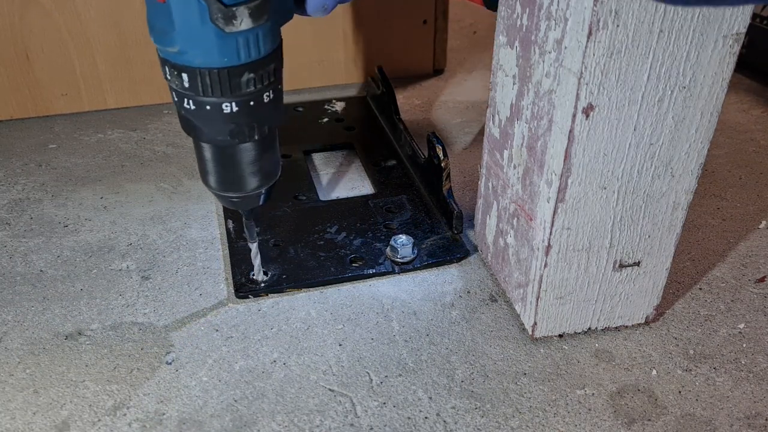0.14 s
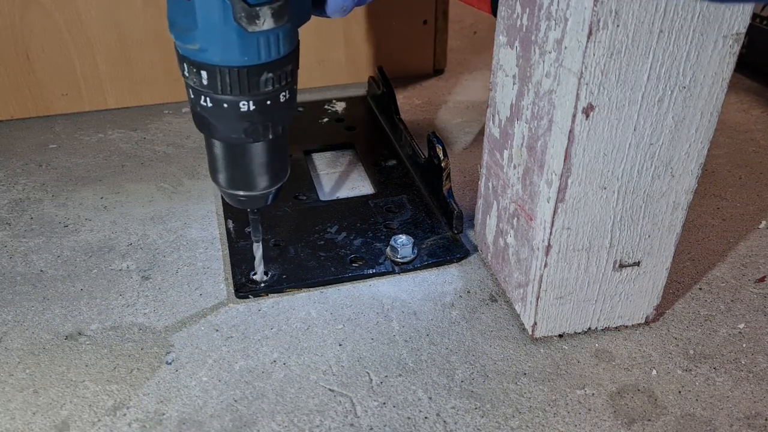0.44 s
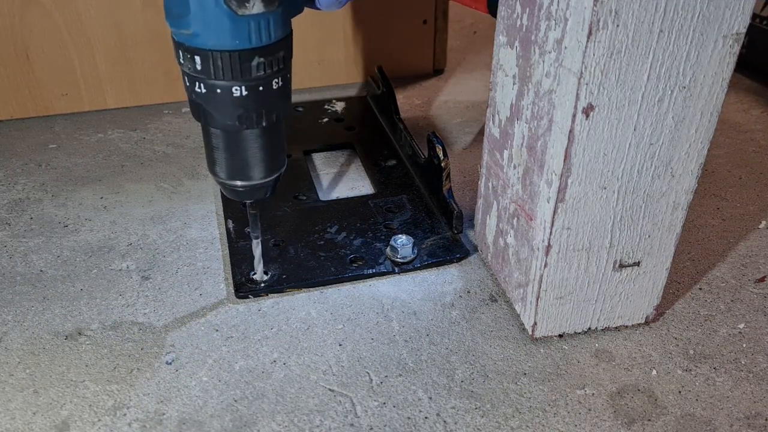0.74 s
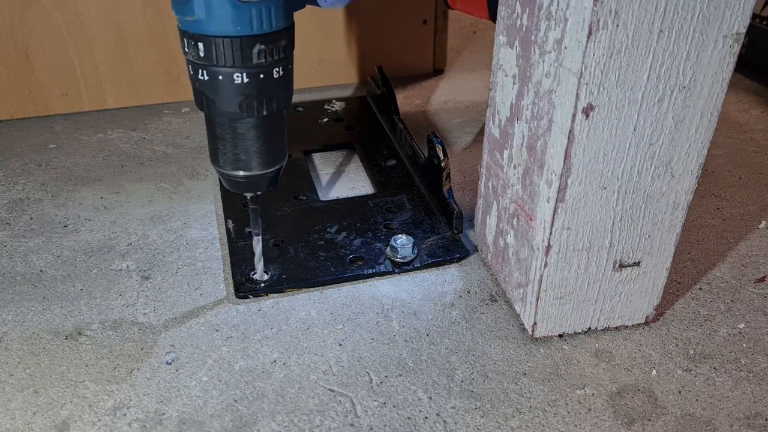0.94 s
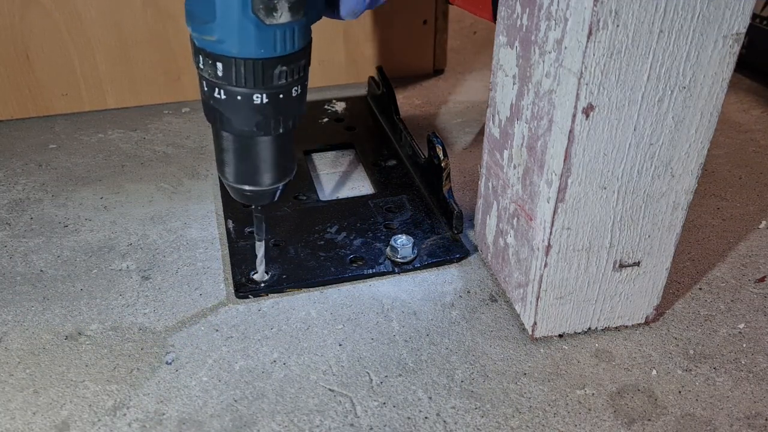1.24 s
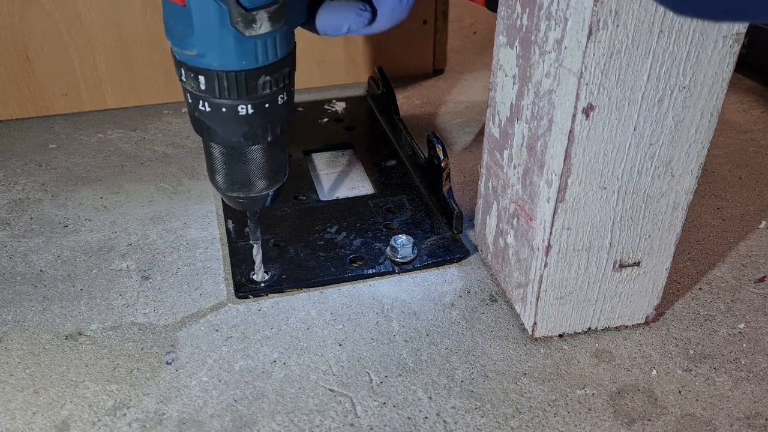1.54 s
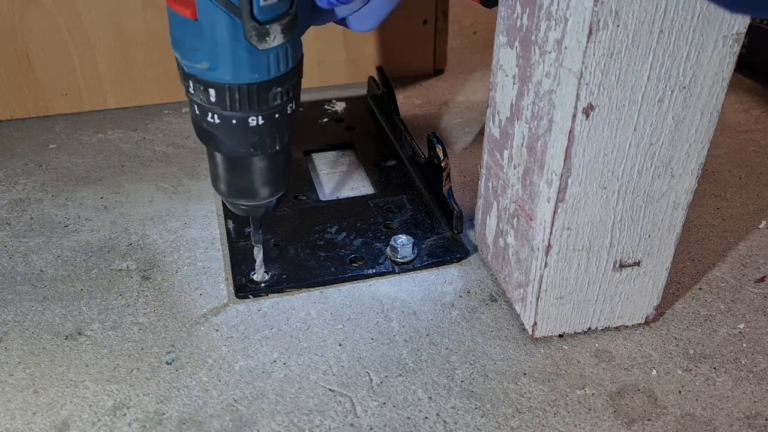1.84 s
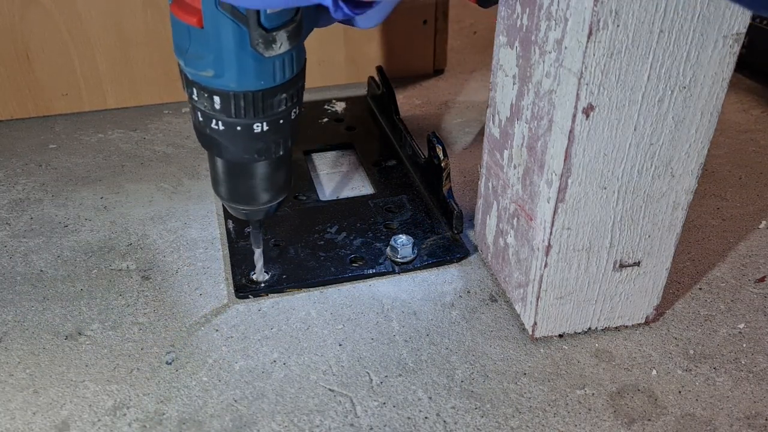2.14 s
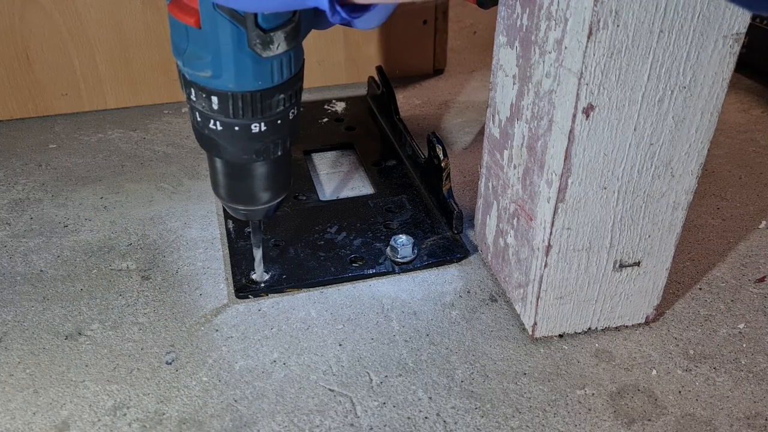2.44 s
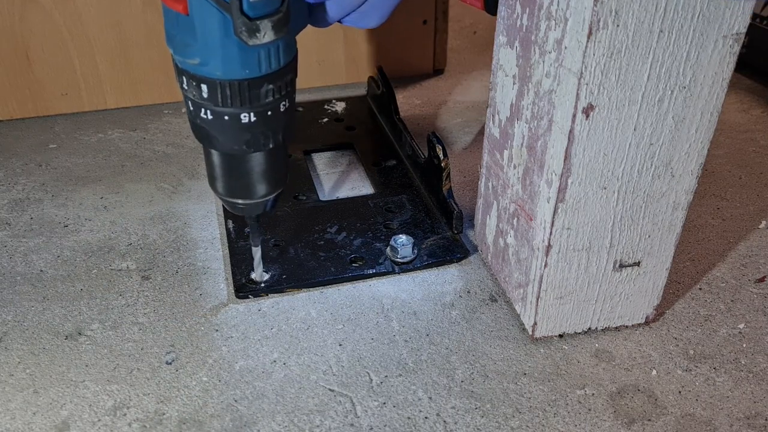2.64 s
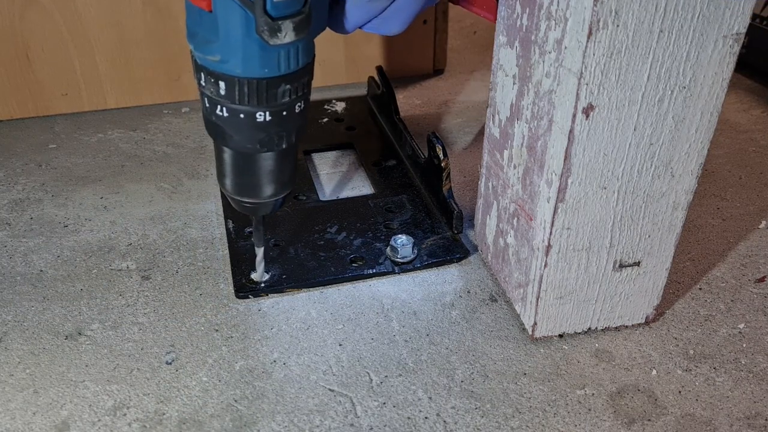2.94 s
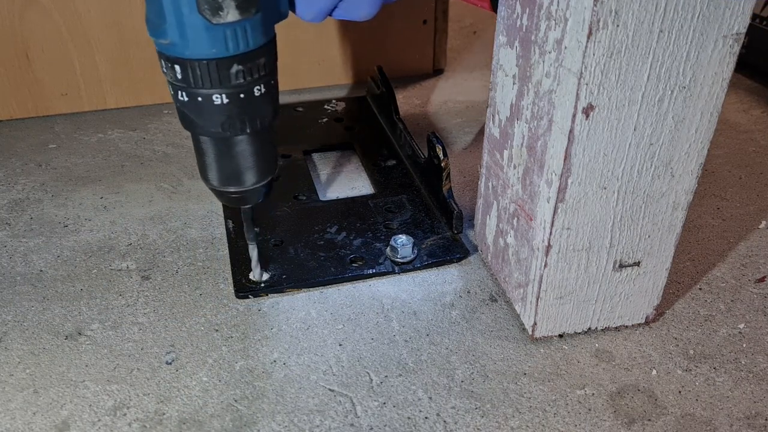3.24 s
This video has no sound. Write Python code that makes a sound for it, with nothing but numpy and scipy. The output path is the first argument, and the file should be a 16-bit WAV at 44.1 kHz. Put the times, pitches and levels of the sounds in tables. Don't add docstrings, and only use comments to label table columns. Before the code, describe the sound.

Cordless hammer drill buzzes harshly on a concrete floor, steps up, pauses, and restarts higher

```python
import sys
import numpy as np
from scipy import signal
from scipy.fft import rfft, irfft, next_fast_len
from scipy.io import wavfile
from scipy.ndimage import map_coordinates

SR = 44100
rng = np.random.default_rng(int(sys.argv[2]) if len(sys.argv) > 2 else 0)


def waveform_to_disk(signal):
    frames = np.transpose(np.atleast_2d(signal))
    scaled = np.clip(frames, -1, 1) * 32767
    samples = np.round(scaled).astype(np.int16)
    wavfile.write(sys.argv[1], SR, samples)


def boost(x):
    u = np.asarray(x, float) / 20
    return 10 ** u


N = 149940

# (time [s], blow rate [1/s])
FIRST = [(0, 83.2), (.11, 85.2), (.27, 85.6), (.44, 84.5), (.5, 86.3), (.564, 134.5), (.6, 143.5),
         (.66, 150.4), (1.07, 151.9), (1.22, 155), (1.35, 155.6), (1.405, 128)]
SECOND = [(1.932, 63), (2.032, 141.5), (2.158, 252.4), (2.204, 270), (2.358, 268), (2.41, 261.5),
          (2.72, 259.5), (2.81, 255), (3.12, 258.7), (3.2, 265.8), (3.4, 265)]


def unit(x):
    return x / np.sqrt(np.mean(x ** 2) + 1e-20)


def along(points, hz):
    f, v = np.transpose(points)
    return np.interp(np.log(hz + 1), np.log(f + 1), v)


def wobble(rate):
    knots = rng.standard_normal(int(N * rate / SR) + 4)
    return map_coordinates(knots, [np.arange(N) * rate / SR])


def filtered(x, response):
    m = next_fast_len(N + SR // 2)
    return irfft(rfft(x, m) * response(np.fft.rfftfreq(m, 1 / SR)), m)[..., :N]


def body(peaks):
    def response(f):
        total = 0
        for k, (centre, width, db) in enumerate(peaks):
            damping = 1j * f * width
            total = total + (-1) ** k * boost(db) * damping / (centre ** 2 - f * f + damping)
        return total
    return response


def spikes(times, sizes):
    at = np.clip(times * SR, 0, N - 2)
    i = at.astype(int)
    return np.bincount(i, sizes * (1 - at + i), N) + np.bincount(i + 1, sizes * (at - i), N)


def air():
    # (frequency [Hz], level [dB])
    hush = [(18, -41.5), (30, -6), (141, -11.5), (988, -38.5), (1350, -30), (2010, -33), (16000, -32)]
    noise = rng.standard_normal((2, N))
    return boost(-56.5) * unit(filtered(noise, lambda f: boost(along(hush, f))))


def garage(x):
    # (frequency [Hz], decay time t60 [s])
    decay = [(100, 0.18), (500, 0.39), (2000, 0.23), (6000, 0.2), (14000, 0.055)]
    # (frequency [Hz], room over direct [dB])
    wetness = [(60, -23.5), (250, -7), (600, -7.5), (2000, -2), (8000, -4.5)]
    hop = 5120
    out = np.zeros((2, N + 2 * SR))
    padded = np.pad(x, (hop, 3 * hop))
    fade = np.sin(np.pi * np.arange(2 * hop) / (2 * hop))
    for start in range(0, N + hop, hop):
        hz, t, z = signal.stft(rng.standard_normal((2, SR // 3)), SR, nperseg=256)
        z = z * boost(-60 * t / along(decay, hz)[:, None])
        energy = np.sum(abs(z) ** 2, axis=2).mean(axis=0)
        z = z / np.sqrt(energy)[:, None] * boost(along(wetness, hz))[:, None]
        tail = signal.istft(z, SR, nperseg=256)[1] / 115
        piece = padded[start:start + 2 * hop] * fade
        wet = signal.fftconvolve(piece[None], tail, axes=1)
        out[:, start:start + wet.shape[1]] += wet
    return out[:, hop - 130:][:, :N]


def motor_windup():
    t = np.arange(N) / SR
    begin, end = 1.893, SECOND[0][0]
    rise_db = 5 * np.clip((t - begin) / (end - begin), 0, 1)
    turning = (t > begin) * (t < end) * boost(-42 + rise_db)
    housing = body([(507, 600, -10.5), (1520, 2700, -9), (4400, 1500, -15)])
    return turning * unit(filtered(rng.standard_normal(N), housing))


def tool_thuds():
    # (time [s], level [dB])
    contacts = [
        (1.693, -46.5),
        (1.699, -38.5),
        (1.716, -41),
        (1.734, -44),
        (1.765, -51),
        (1.804, -56),
        (1.84, -64.5),
    ]
    # (centre [Hz], width [Hz], level [dB])
    thud_modes = [(128, 26, 10.5), (68, 26, 2), (604, 390, -15.5)]
    s, db = np.transpose(contacts)
    return 250 * filtered(spikes(s, boost(db)), lambda f: body(thud_modes)(f) / (1 + 1j * f / 700) ** 2)


def bit_scrapes():
    # (time [s], length [s], level [dB])
    strokes = [
        (1.603, 0.047, -41),
        (1.664, 0.043, -51),
        (1.805, 0.017, -58),
        (1.871, .05, -47.5),
    ]
    # (centre [Hz], width [Hz], level [dB])
    bit_modes = [(2620, 220, -2.5), (3940, 120, -11), (4244, 68, 0), (4700, 100, -6), (6100, 140, -3),
                 (10000, 170, -6), (12400, 100, -4)]
    t = np.arange(N) / SR
    envelope = np.zeros(N)
    for s, length, db in strokes:
        attack = np.clip((t - s) / .004, 0, 1)
        release = np.clip((s + length - t) / 0.021 + 1, 0, 1) ** 2
        envelope += boost(db) * attack * release
    rub = filtered(rng.standard_normal(N), lambda f: body(bit_modes)(f) + 0.074 * (f > 1500))
    return envelope * unit(rub)


def switch_clicks():
    # (time [s], level [dB], decay time t60 [s], share of the hollow tone [0-1])
    clicks = [
        (1.505, -19.5, .014, .1),
        (1.6063, -38.5, .01, .5),
        (1.8043, -44.5, 0.024, .3),
        (1.8792, -19, 0.013, .9),
    ]
    # (centre [Hz], width [Hz], level [dB])
    switch_modes = [(2800, 400, -0.5), (7560, 360, 8), (13800, 1200, -3.5)]
    hollow_modes = [(2980, 1000, 4.5), (4300, 700, 2)]
    t = np.arange(N) / SR
    bursts = np.zeros((2, N))
    for s, db, t60, share in clicks:
        envelope = (t >= s) * boost(db - 60 * np.clip(t - s, 0, 1) / t60)
        bursts += np.array([[1 - share], [share]]) * envelope

    def response(f):
        hiss = 0.24 * 1j * f / (1j * f + 1500)
        return np.array([body(switch_modes)(f), body(hollow_modes)(f)]) + hiss
    return filtered(bursts * rng.standard_normal(N), response).sum(axis=0)


def blows():
    # (time [s], effort [dB], weight on the slab [dB], bite of the ratchet [dB])
    load = [(0, -19.5, 1.5, 2.5), (.06, -20, 4, 3.5), (.19, -20, -20, -0.5), (.28, -21, -5, 4),
            (.48, -17.5, -15.5, 3), (.54, -13.5, -13, -2), (.66, -15, -13.5, -1.5), (1.32, -18, -12.5, -2),
            (1.405, -28, -7, 0), (1.932, -22, -4, -4.5), (2.04, -14, 0.5, -1), (2.11, -13, -3.5, .5),
            (2.22, -14, -6, -4), (2.4, -15.5, -3, -2.5), (2.701, -16.5, -8.5, -10), (2.801, -16, -10, -0.5),
            (3.12, -18, -9, -6), (3.4, -21, -12.5, 1)]
    t = np.arange(N) / SR
    even, rough, effort = np.zeros(N), np.zeros(N), np.zeros(N)
    for pull in FIRST, SECOND:
        s, rate = np.transpose(pull)
        on = (t >= s[0]) & (t <= s[-1])
        turns = np.cumsum(np.interp(t, s, rate) * on) / SR
        count = int(turns[-1]) + 1
        when = np.interp(np.arange(count) + .03, turns[on], t[on])
        size = np.interp(when, s, rate) ** -.5
        luck = rng.standard_normal((count, 2))
        jitter_s, scatter_db = .00006 * luck[:, 0], 1 * luck[:, 1]
        even += spikes(when, size * boost(1.92 * luck[:, 1]))
        rough += spikes(when + jitter_s, size * boost(scatter_db))
        effort += on
    s, effort_db, weight_db, bite_db = np.transpose(load)
    effort = effort * boost(np.interp(t, s, effort_db))
    weight, bite = boost(np.interp(t, s, weight_db)), boost(np.interp(t, s, bite_db))
    return even * effort, rough * effort, effort, weight, bite


def slab(even, effort, weight):
    # (centre [Hz], width [Hz], level [dB])
    slab_modes = [(76, 61, -6.5), (148.3, 32.7, 3.5)]
    thump = filtered(even * weight, lambda f: body(slab_modes)(f) / (1 + 1j * f / 220) ** 2)
    tremble = effort * weight * rng.standard_normal(N)
    shake = filtered(tremble, lambda f: body(slab_modes[1:])(f) ** 2)
    return boost(-14) * unit(thump) + boost(-20) * unit(shake)


def base_plate(even, bite):
    # (centre [Hz], width [Hz], level [dB])
    plate_modes = [(251.3, 109, -2), (312, 41, 7.5), (446, 44, -3), (570, 104, -3.5)]
    drive = even * bite * boost(0.97 * wobble(15))
    return boost(-5.5) * unit(filtered(drive, lambda f: body(plate_modes)(f) * 1j * f / (1j * f + 250)))


def gear_casing(even):
    # (centre [Hz], width [Hz], level [dB])
    casing_modes = [(1116, 42, 5.5), (1330, 106, 0.5), (1682, 110, -5), (2574, 92, -4.5)]
    return boost(-19) * unit(filtered(even, lambda f: body(casing_modes)(f) ** 2))


def chuck(rough):
    # (centre [Hz], width [Hz], level [dB])
    chuck_modes = [(842, 360, -7), (906, 80, 3.5), (1154, 74, 5), (1284, 163, 1.5), (1640, 61, 3.5),
                   (1923, 89, -4), (2660, 250, 0.5), (3404, 400, -9.5), (4660, 1000, -21),
                   (6090, 195, -7.5), (7340, 160, -11)]
    return boost(-4) * unit(filtered(rough, lambda f: body(chuck_modes)(f) * 1j * f / (1j * f + 600)))


def grit(rough, effort, loud):
    # (frequency [Hz], density level [dB])
    grit_spectrum = [(120, -45), (400, -7.5), (1200, -1), (3500, -10), (7400, -10), (8900, -22),
                     (11500, -15), (15800, -16)]
    t = np.arange(N) / SR
    spray_s, steady, apart_hz = .003, .55, 2200
    bursts = unit(filtered(rough, lambda f: 1 / (1 + 2j * np.pi * f * spray_s)))
    spray = steady * effort / loud + bursts
    grains = spray * boost(1.06 * wobble(50)) * rng.standard_normal((3, N))

    def response(f):
        apart = 1 / (1 + (apart_hz / (f + 1)) ** 2)
        return boost(along(grit_spectrum, f)) * np.sqrt([1 - apart, apart, apart])
    shared, *separate = filtered(grains, response)
    speed = np.interp(t, *np.transpose([*FIRST, *SECOND]))
    brighten = boost(2 * np.log2(speed / 150))
    return unit(shared + np.array(separate) * brighten)


def drill():
    even, rough, effort, weight, bite = blows()
    loud = np.sqrt(np.mean(effort ** 2))
    low = slab(even, effort, weight) + base_plate(even, bite)
    return loud * (low + gear_casing(even) + chuck(rough) + grit(rough, effort, loud))


def scene():
    # (frequency [Hz], left over right [dB])
    balance = [(60, 1.5), (180, -1.7), (550, -2), (1300, 0.6), (5000, 1), (7000, -2.5), (9000, 12.5),
               (14000, 4.5)]
    lag_s = -0.00021
    side = np.array([[1], [-1]])
    hands = motor_windup() + tool_thuds() + bit_scrapes() + switch_clicks()
    drilling = drill()
    direct = filtered(drilling + hands, lambda f: np.exp(-1j * np.pi * f * lag_s * side))
    room = garage(drilling[0] + boost(-7) * hands)
    heard = filtered(direct + room, lambda f: boost(side * along(balance, f) / 2))
    return heard + air()


def low_pass(x):
    return signal.sosfilt(signal.butter(12, 16240, fs=SR, output="sos"), x)


def record(dry):
    clipped = np.clip(dry, -1, 1)
    return low_pass(filtered(clipped, lambda f: f < 16240))


dry = scene()
out = record(dry)
waveform_to_disk(out)
```